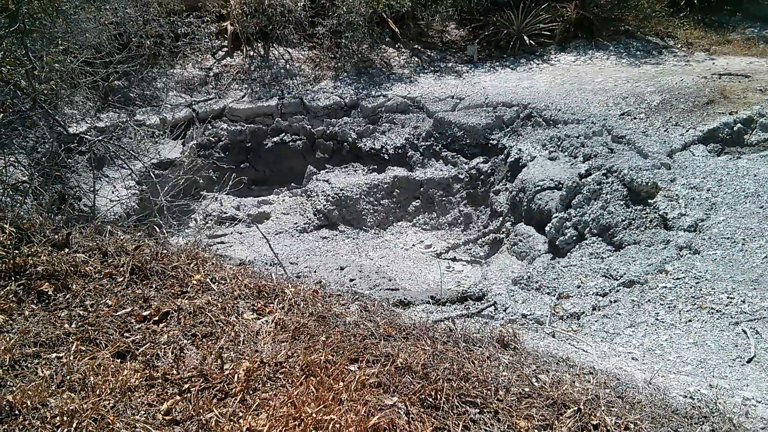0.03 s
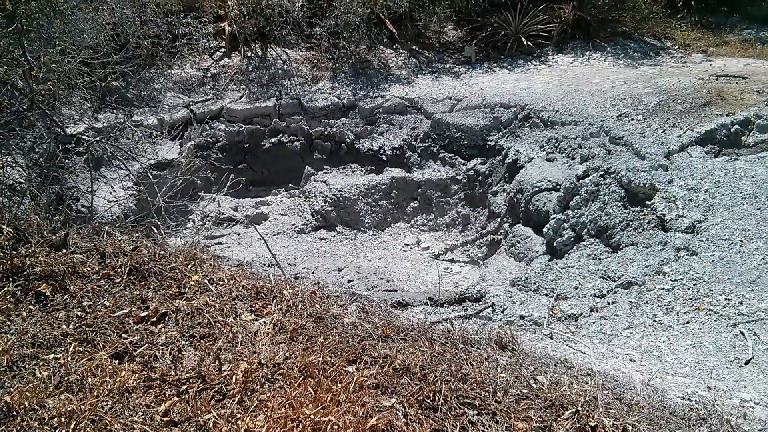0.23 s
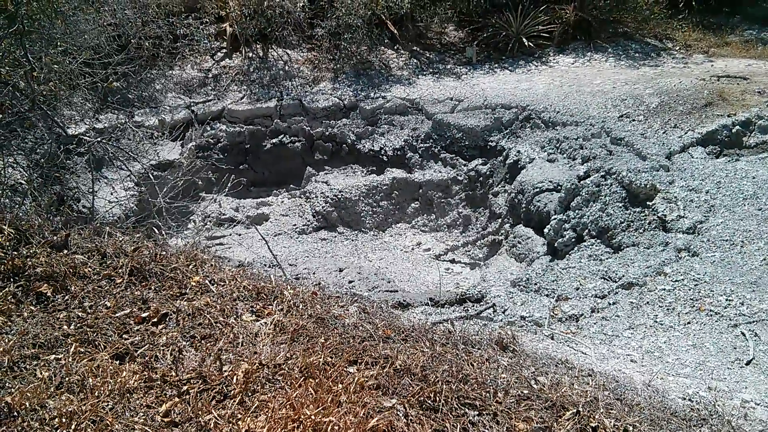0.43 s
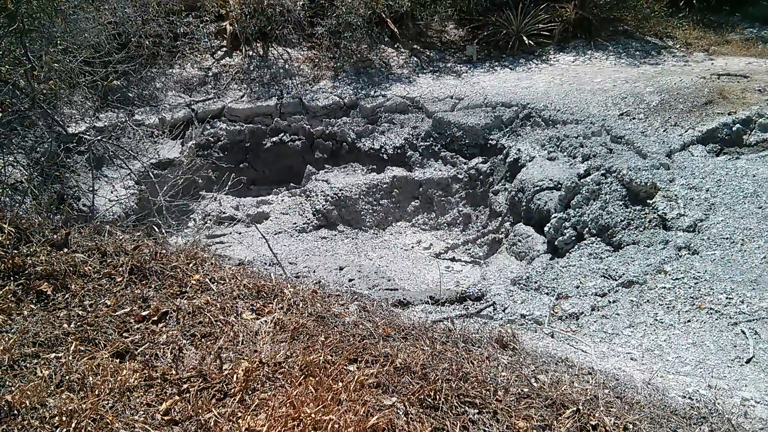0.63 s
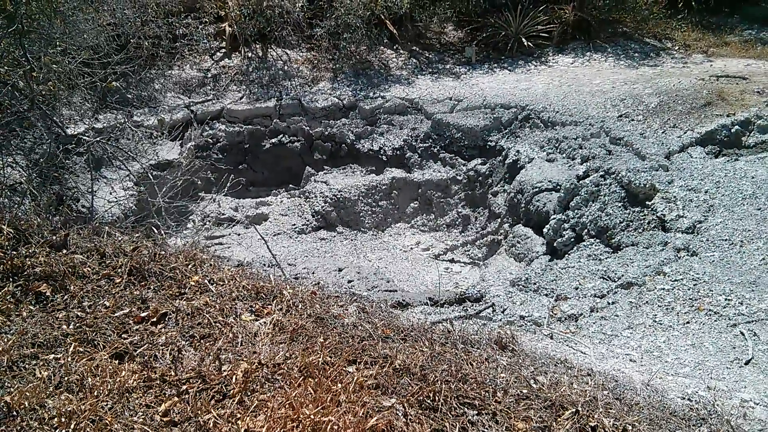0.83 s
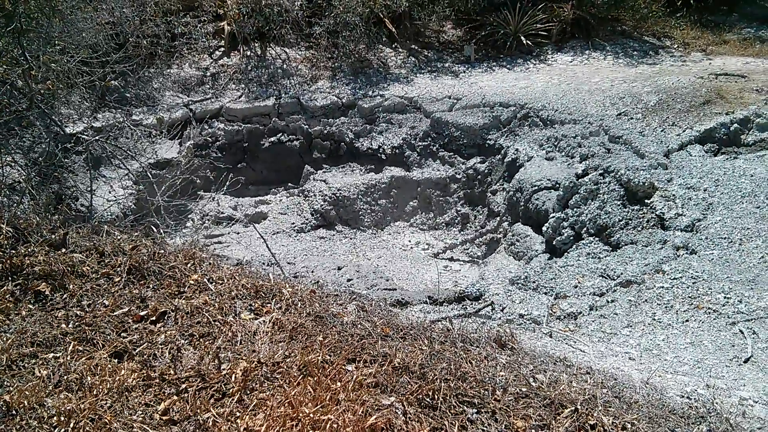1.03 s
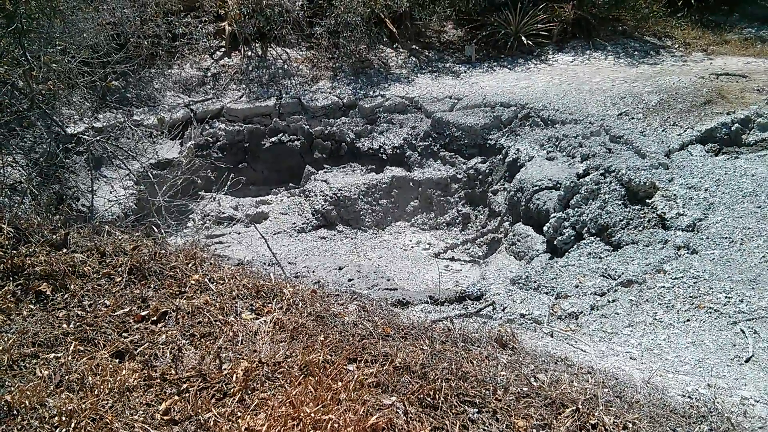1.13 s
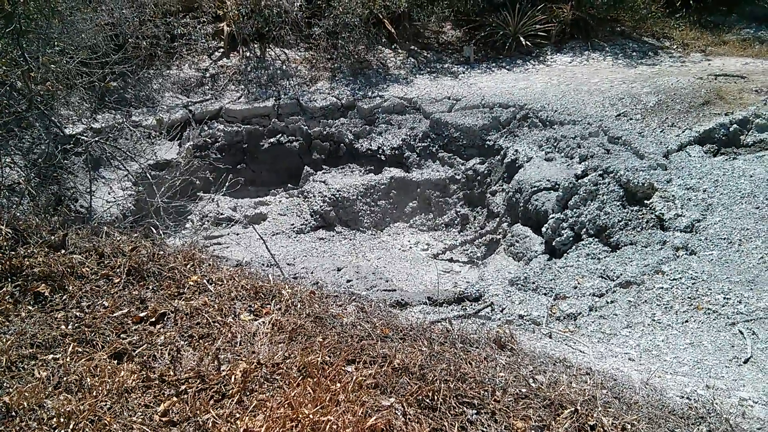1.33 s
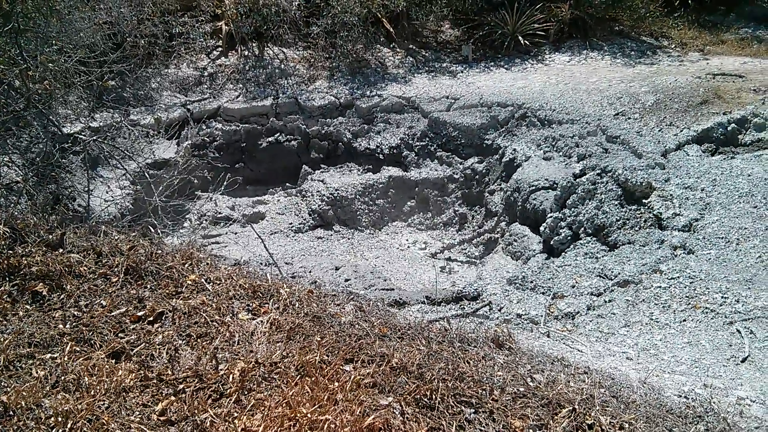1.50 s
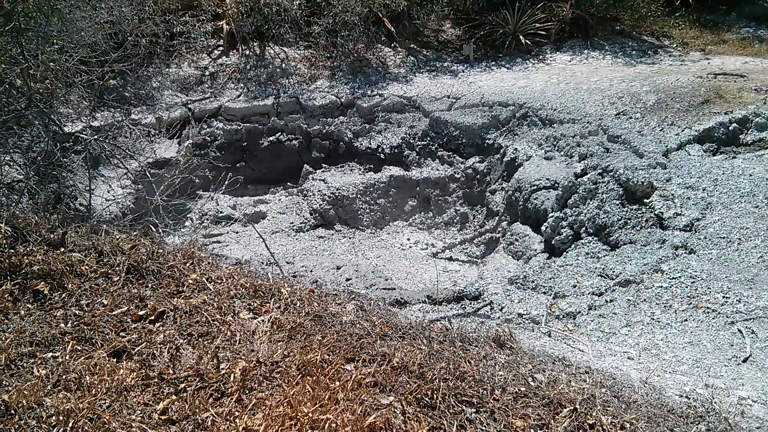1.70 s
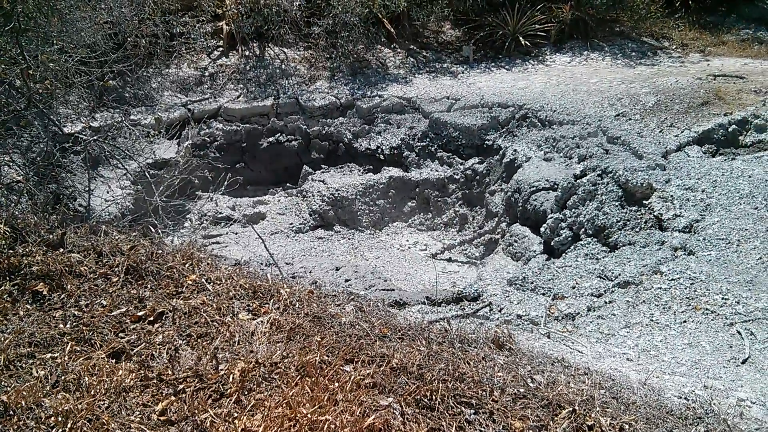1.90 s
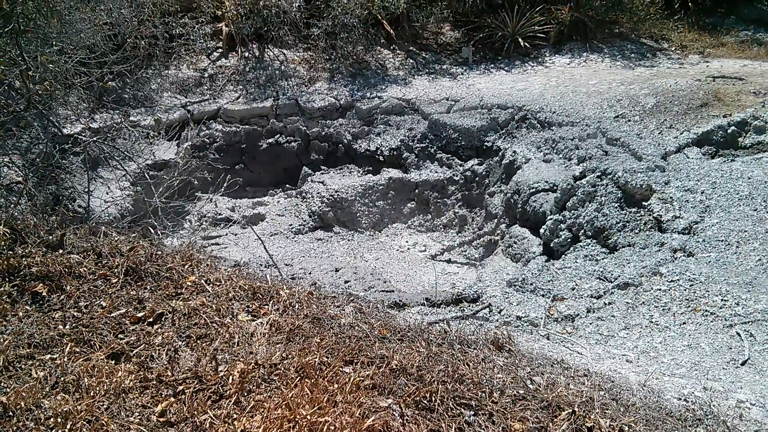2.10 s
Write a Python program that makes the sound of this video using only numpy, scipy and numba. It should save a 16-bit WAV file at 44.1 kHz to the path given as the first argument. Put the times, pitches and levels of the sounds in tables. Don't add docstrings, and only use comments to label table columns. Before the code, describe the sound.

Thick mud bubbles plop and slap irregularly, one heavy burst early, then sparser blips over soft hissing

```python
import sys
import numpy as np
from scipy import signal
from scipy.io import wavfile
from scipy.ndimage import uniform_filter1d
from numba import njit

SR = 44100
rng = np.random.default_rng(int(sys.argv[2]) if len(sys.argv) > 2 else 0)


def nominal_scale(level):
    x = np.asarray(level, float) / 20
    return 10 ** x


def generate_wav(sig):
    pcm = np.round(np.clip(np.atleast_2d(sig).T, -1, 1) * 32767).astype(np.int16)
    wavfile.write(sys.argv[1], SR, pcm)


N = 94815

# centre_hz, width_hz, level_db
HOLLOW_MODES = [(633, 140, 6.5), (935, 90, 7.5), (1227, 320, 0.5), (1428, 340, 4), (1800, 185, 2.5),
                (2200, 445, -1.5)]
# centre_hz, width_hz, level_db
HOUSING_MODES = [(3756, 1360, -20), (4900, 1010, -14), (6756, 950, -8.5), (7800, 1310, -0.5),
                 (10080, 2160, -7.5), (14360, 13000, -22.5)]


@njit
def svf(x, hz, width):
    y, band, low = np.empty(len(x)), 0., 0.
    g, damping = np.tan(np.pi * hz / SR), width / hz
    for i in range(len(x)):
        v = (band + g * (x[i] - low)) / (1 + g * (g + damping))
        low += 2 * g * v
        band = 2 * v - band
        y[i] = damping * v
    return y


def unit(x):
    return x / np.sqrt(np.mean(x ** 2))


def walk(rate_hz):
    hold = int(SR / rate_hz)
    steps = np.repeat(rng.standard_normal(N // hold + 1), hold)
    return 1.7 * uniform_filter1d(uniform_filter1d(steps, hold), hold)[:N]


def resonate(x, modes):
    out = 0
    for k, (hz, width_hz, db) in enumerate(modes):
        once = svf(x, 1. * hz, 1.26 * width_hz)
        out = out + (-1) ** k * nominal_scale(db) * svf(once, 1. * hz, 1.26 * width_hz)
    return out


def steam(t):
    # time_s, level_db
    vent_flow = [(0.0, -49.5), (0.1, -49.5), (0.39, -39.5), (0.53, -56.5), (0.78, -47), (0.93, -51),
                 (1.14, -51), (1.28, -49.5), (1.5, -52), (1.93, -55), (2.07, -52.5), (2.15, -48)]
    flow_db = np.interp(t, *np.array(vent_flow).T) + 0.5 * walk(10)
    hiss = 0
    for mode in HOUSING_MODES:
        hiss = hiss + resonate(rng.standard_normal(N), [mode]) * nominal_scale(1.54 * walk(23.21))
    hollow_hiss = unit(resonate(rng.standard_normal(N), HOLLOW_MODES))
    return nominal_scale(flow_db) * unit(hiss) + nominal_scale(flow_db - 12.5) * hollow_hiss


def simmer(t):
    # band_hz, density_db (per Hz)
    simmer_bands = [(18, -39), (30, 1.5), (332, 4.5), (428, -3), (620, 4), (799, -16.5), (934, -7.5),
                    (2080, -9.5), (3200, -49), (4160, -65), (7040, -120)]
    # time_s, level_db
    churn_levels = [
        (0.0, -49.5),
        (0.23, -56.5),
        (0.75, -61),
        (0.93, -49.5),
        (1.47, -59.5),
        (1.89, -49.5),
        (2.15, -55),
    ]
    band_hz, band_db = np.array(simmer_bands).T
    churn_db = np.interp(t, *np.array(churn_levels).T)
    churn_db = churn_db - churn_db.mean()
    out = 0
    for hz in 32 * 2 ** np.arange(0, 6.6, 1 / 3):
        db = np.interp(np.log(hz), np.log(band_hz), band_db)
        db = db + 1.3 * walk(13.74) + churn_db * min(200 / hz, 1)
        out = out + resonate(rng.standard_normal(N), [(hz, hz / 4, 0)]) * nominal_scale(db)
    return unit(out) * nominal_scale(-52.5)


def bubbles(rows, rise=0.5):
    overtone_db, slosh_db, slosh_hz = -33.5, -20.5, 260
    out = np.zeros(N + SR)
    waver = np.pad(1 + 0.04 * walk(150), (0, SR), mode="edge")
    slosh = unit(resonate(rng.standard_normal(N), [(slosh_hz, slosh_hz, 0)]))
    slosh = np.pad(slosh, (0, SR))
    for start_s, start_hz, end_hz, length_s, peak_db in rows:
        u = np.arange(int(length_s * SR)) / (length_s * SR)
        first = int(max(start_s, 0) * SR)
        i = slice(first, first + len(u))
        loose = min(300 / start_hz, 1)
        pitch_hz = (start_hz + (end_hz - start_hz) * u ** 0.55) * waver[i] ** loose
        phase = 2 * np.pi * np.cumsum(pitch_hz) / SR
        tone = np.sin(phase) + nominal_scale(overtone_db) * loose ** 2 * np.cos(2 * phase)
        tone = tone + nominal_scale(slosh_db) * loose ** 2 * slosh[i]
        out[i] += nominal_scale(peak_db) * np.sin(np.pi * u ** rise) ** 1.4 * tone
    return out[:N] * nominal_scale(1.2 * walk(150))


def small_bubbles():
    per_s, low_hz, octaves = 70, 90, 3.48
    when, smallness, cycles, faintness = rng.random((int(per_s * N / SR), 4)).T
    hz = low_hz * 2 ** (octaves * smallness)
    peak_db = -60 - 4 * np.log(faintness + 0.12)
    return bubbles(zip(when * N / SR, hz, 1.14 * hz, (2.85 + 4 * cycles) / hz, peak_db))


def large_bubbles():
    # start_s, start_hz, end_hz, length_s,
    # peak_db
    plops = [(.003, 547, 633, 0.015, -40.5), (.025, 230, 326, 0.011, -42), (.160, 214, 330, 0.031, -39.5),
             (.2105, 125, 118, 0.014, -18.5), (.2335, 135, 152, 0.033, -21.5), (.232, 322, 337, 0.019, -30),
             (.252, 140, 152, 0.052, -27.5), (.273, 275, 345, 0.014, -17), (.3165, 114, 127, .03, -15),
             (.342, 82.4, 117.7, 0.0526, -20), (.390, 323, 368, 0.02, -34), (.414, 300, 396, 0.018, -34),
             (.552, 192, 358, 0.016, -36), (.712, 73.6, 93.5, 0.035, -44), (.759, 224, 387, 0.021, -24.5),
             (.818, 135, 175, 0.014, -32), (.884, 244, 322, 0.0093, -37.5), (.942, 260, 240, 0.018, -42),
             (.971, 206, 230, 0.012, -42), (1.014, 190, 331, 0.039, -28.5), (1.112, 211, 352, 0.032, -43),
             (1.142, 198, 127, 0.048, -42.5), (1.4475, 252, 348, 0.017, -35.5),
             (1.4995, 293, 567, 0.02, -35.5),
        (1.516, 383, 357, 0.017, -40),
        (1.693, 200, 321, 0.037, -29),
        (1.7255, 265, 355, .013, -21),
        (1.729, 112, 139, 0.015, -38),
        (1.734, 403, 550, 0.017, -37.5),
        (1.849, 170, 230, 0.017, -20.5),
        (1.859, 216, 348, 0.025, -28),
        (1.924, 280, 322, 0.012, -40),
        (2.036, 102, 138, 0.015, -36),
    ]
    more_bubbles = [(0.199, 80, 90, 0.016, -28), (0.219, 277, 327, 0.018, -35.5), (.262, 417, 560, .02, -36),
                    (0.377, 193, 260, 0.037, -35.5), (.402, 60, 66, .045, -33), (.236, 62, 66, .05, -32),
                    (0.424, 160, 171, 0.024, -37), (.773, 364, 398, 0.025, -37.5), (.774, 200, 175, 0.016, -35),
                    (0.781, 615, 590, .02, -46), (.797, 180, 200, 0.013, -45), (0.83, 69.6, 79.5, 0.024, -42),
                    (.852, 490, 500, 0.035, -46), (.902, 666, 690, 0.025, -51.5),
                    (0.925, 634, 696, 0.015, -46.5), (.982, 130, 110, .02, -58), (1.006, 121, 151, 0.021, -28.5),
                    (1.167, 100, 110, 0.041, -43.5), (1.225, 464, 490, 0.026, -45),
                    (1.432, 590, 706, 0.015, -48), (1.46, 404, 524, .012, -44), (1.487, 423, 454, 0.015, -44),
                    (1.543, 600, 615, 0.014, -47), (1.6844, 138, 189, 0.017, -24), (1.755, 440, 470, .013, -39),
                    (1.768, 515, 755, 0.017, -49.5), (1.882, 360, 400, 0.023, -44.5),
                    (1.894, 288, 298, 0.017, -44.5), (2.0, 487, 545, 0.029, -44.5)]
    return bubbles(plops + more_bubbles)


def droplets():
    # start_s, start_hz, end_hz, length_s, peak_db
    drops = [(0.235, 650, 590, 0.014, -34), (0.255, 580, 750, .016, -28), (0.268, 820, 1012, 0.029, -35.5),
             (0.275, 1150, 1230, 0.011, -33.5), (.3165, 1190, 1200, 0.016, -31),
             (0.316, 704, 720, 0.014, -37), (.341, 1210, 1130, 0.025, -32.5), (.344, 955, 925, 0.026, -32),
             (0.339, 670, 760, 0.017, -34), (0.394, 1280, 1530, 0.018, -31.5), (.39, 660, 660, .014, -35.5),
             (.402, 1180, 1240, 0.013, -30.5), (0.26, 1210, 1300, 0.011, -38.5),
             (1.2, 580, 620, 0.015, -40), (1.145, 1457, 1340, 0.017, -34.5),
             (1.1455, 5030, 5250, 0.011, -31), (1.224, 1500, 1400, 0.0054, -42),
             (1.266, 1220, 1500, 0.012, -38), (1.51, 1200, 1300, 0.014, -42), (1.728, 2050, 2050, .01, -46),
             (1.85, 1450, 1500, .012, -46), (1.519, 1150, 1500, 0.026, -40),
             (1.531, 1400, 1850, 0.017, -41), (1.975, 1200, 1310, 0.012, -41.5),
             (2.014, 2070, 2100, 0.018, -44.5), (2.037, 2200, 1800, 0.015, -44),
             (2.036, 1450, 1500, 0.014, -45.5)]
    return bubbles(drops, rise=0.36) * nominal_scale(1.5 * walk(500))


def splats(t):
    # start_s, spray_db, fade_s, slap_db, spray_low_edge_hz
    mud_throws = [(0.239, -37.5, 0.008, -35, 3000), (0.251, -34, 0.0096, -46, 3000),
                  (.272, -35, 0.0065, -55, 3000), (.284, -29.5, 0.0089, -36.5, 2980),
                  (0.316, -36, 0.026, -43, 3000), (0.342, -33, 0.0026, -42, 2800),
                  (0.3452, -21, 0.003, -36.5, 2770), (0.386, -20, 0.0098, -32, 2940),
                  (.395, -23.5, 0.011, -35.5, 2900), (.417, -29, 0.061, -40.5, 3000),
                  (0.466, -40, 0.024, -50, 3000), (0.783, -35, 0.0043, -70, 8650),
                  (1.084, -39, 0.0059, -44.5, 3000), (1.144, -31, 0.0059, -30, 3000),
                  (1.21, -38, 0.026, -44.5, 3000), (1.327, -42, 0.012, -50.5, 3000),
                  (1.501, -69, 0.049, -45, 3000), (1.572, -35.5, 0.046, -53.5, 7800),
                  (1.731, -49, 0.0055, -47, 3000), (1.818, -38, 0.046, -57, 4730),
                  (1.851, -53, 0.0057, -49, 3000), (2.01, -39, 0.03, -45, 3000),
                  (2.036, -45, 0.013, -59, 3000), (2.095, -30, 0.0054, -74, 6660)]
    grain = nominal_scale(1.02 * walk(350))
    spray = unit(resonate(rng.standard_normal(N), HOUSING_MODES))
    slap = unit(resonate(rng.standard_normal(N), HOLLOW_MODES))
    out = np.zeros(N)
    for start_s, spray_db, fade_s, slap_db, edge_hz in mud_throws:
        i = slice(int(start_s * SR), int((start_s + 0.35) * SR))
        age = np.maximum(t[i] - start_s, 0)
        attack = 1 - np.exp(-age / (0.31 * fade_s))
        env = attack * np.exp(-age / fade_s) * grain[i]
        high_pass = signal.butter(N=6, Wn=edge_hz, btype="high", fs=SR, output="sos")
        bright = signal.sosfilt(high_pass, spray[i])
        out[i] += env * (nominal_scale(spray_db) * bright + nominal_scale(slap_db) * slap[i])
    return out


def sudden_pops():
    # start_s, start_hz, end_hz, length_s, peak_db
    pops = [(.3165, 7600, 7500, .003, -32), (.277, 7600, 7500, .003, -35),
            (.7827, 10350, 9900, 0.0021, -27), (1.0845, 172, 145, 0.029, -22),
            (1.143, 1350, 1145, .011, -22), (1.143, 660, 640, 0.014, -33),
            (1.1435, 2100, 2200, 0.014, -33.5), (1.1435, 950, 900, 0.0091, -36.5),
            (1.146, 7500, 7300, 0.0066, -32), (1.2145, 1490, 1600, .008, -35.5),
            (1.1455, 6230, 6350, 0.011, -30.5), (1.146, 4300, 4400, 0.0057, -44.5),
            (2.0955, 7400, 7640, 0.0069, -35)]
    return bubbles(pops, rise=0.25)


def pit_echo(hits, t):
    age = t[:SR // 5]
    tail = rng.standard_normal(len(age)) * np.exp(-np.log(1000) * age / 0.15)
    tail = tail * (age > 0.003)
    return nominal_scale(-19) * signal.fftconvolve(hits, tail / np.sqrt(np.sum(tail ** 2)))[:N]


def scene():
    t = np.arange(N) / SR
    bed = steam(t) + simmer(t) + small_bubbles()
    hits = large_bubbles() + droplets() + splats(t) + sudden_pops()
    return (bed + hits + pit_echo(hits, t))[None]


def roll_off(x):
    return signal.sosfilt(signal.butter(12, 16400, fs=SR, output="sos"), x)


def record(dry):
    heard = dry[0]
    for notch_hz in (2760., 3260.):
        heard = heard - 0.75 * svf(heard, notch_hz, 260.)
    low_cut = signal.butter(N=2, Wn=42, btype="high", fs=SR, output="sos")
    high_cut = signal.ellip(8, 0.2, 60, 15600, fs=SR, output="sos")
    heard = signal.sosfilt(low_cut, heard)
    return roll_off(signal.sosfilt(high_cut, heard[None]))


dry = scene()
out = record(dry)
generate_wav(out)
```